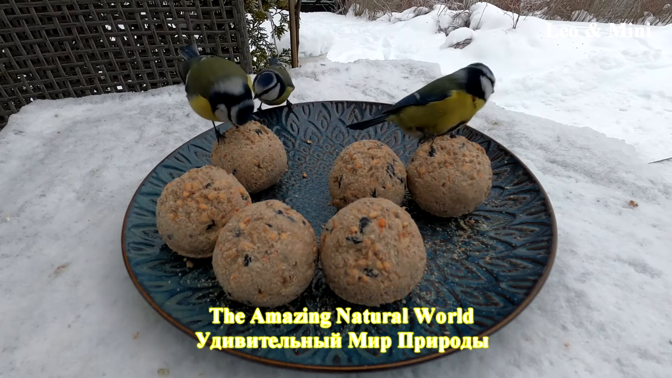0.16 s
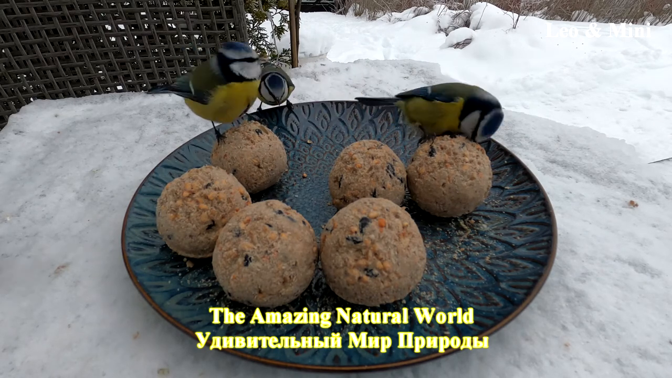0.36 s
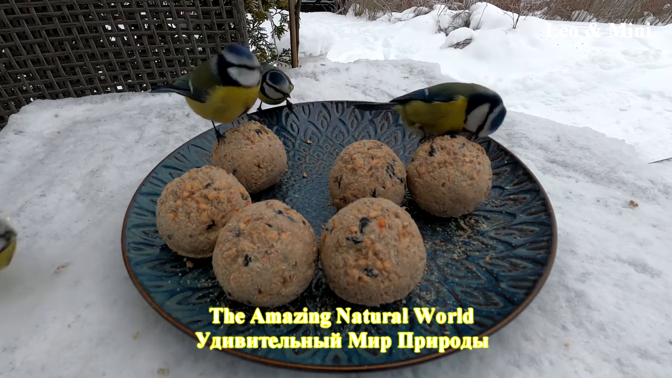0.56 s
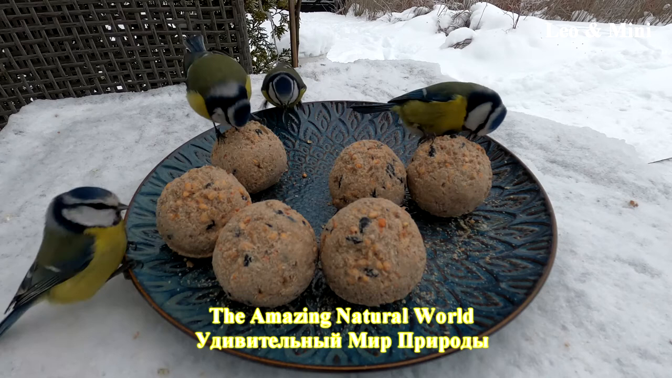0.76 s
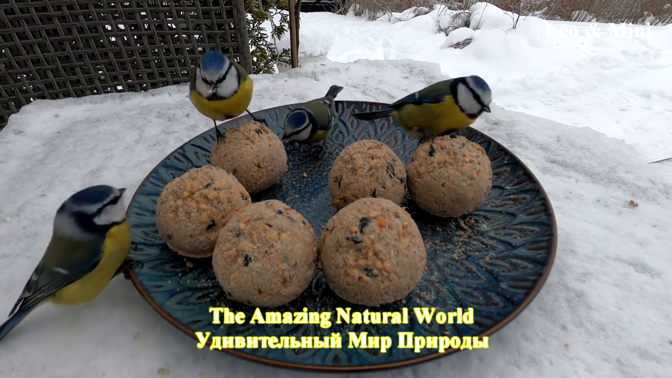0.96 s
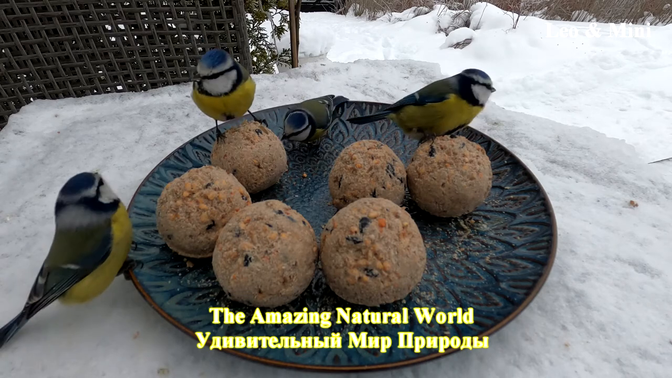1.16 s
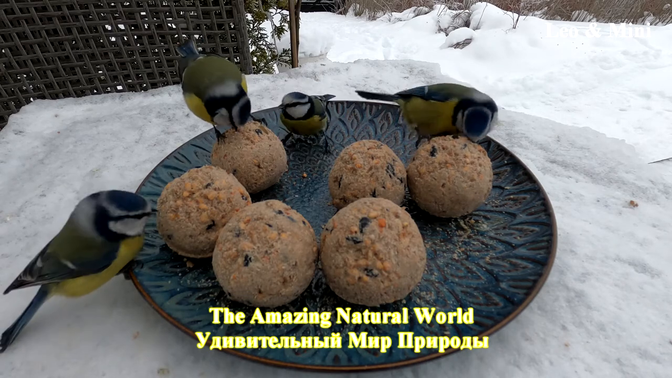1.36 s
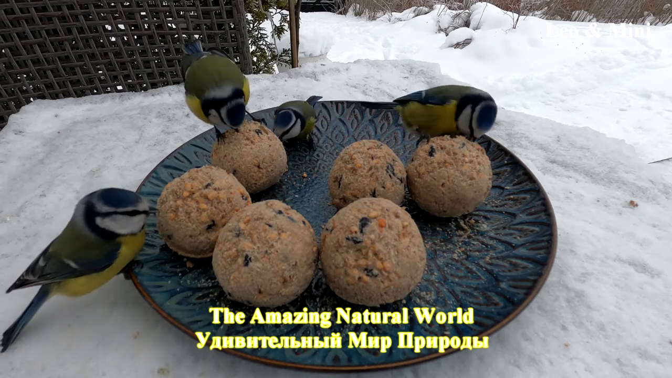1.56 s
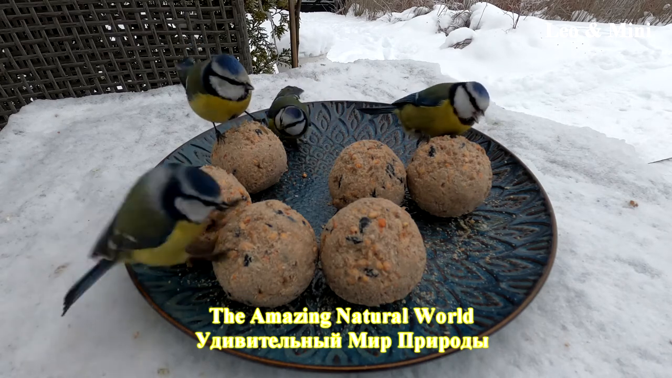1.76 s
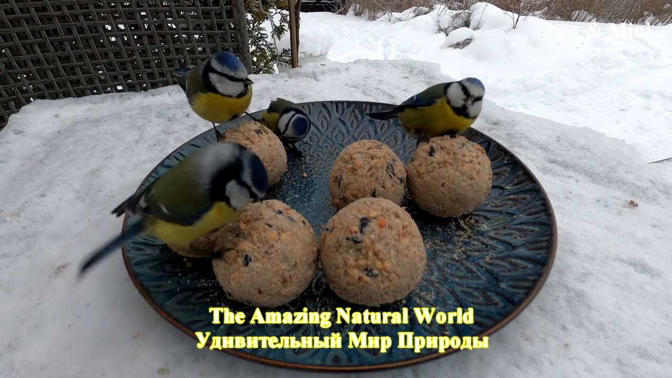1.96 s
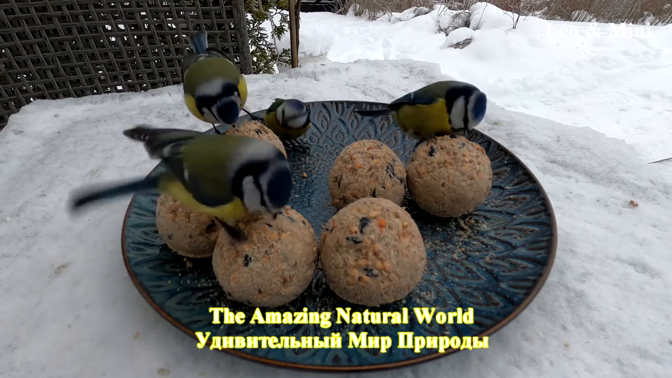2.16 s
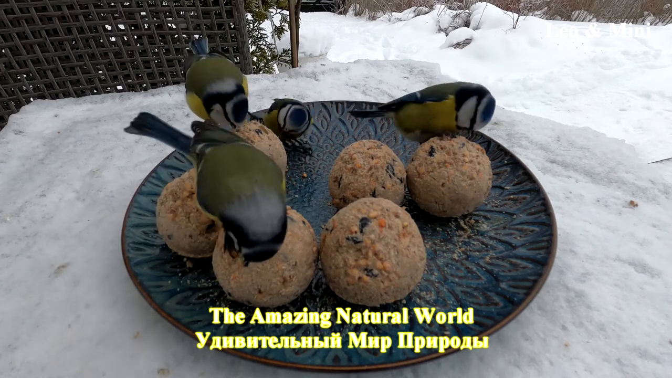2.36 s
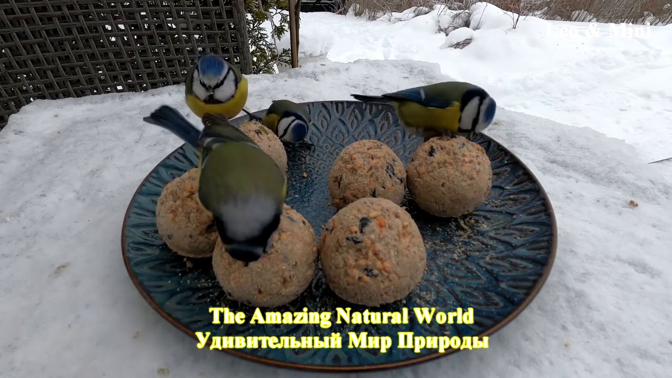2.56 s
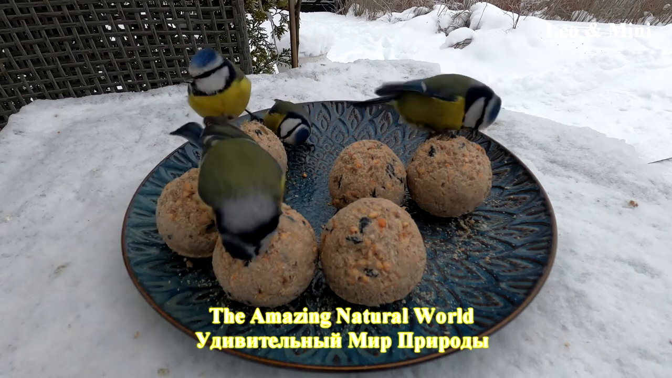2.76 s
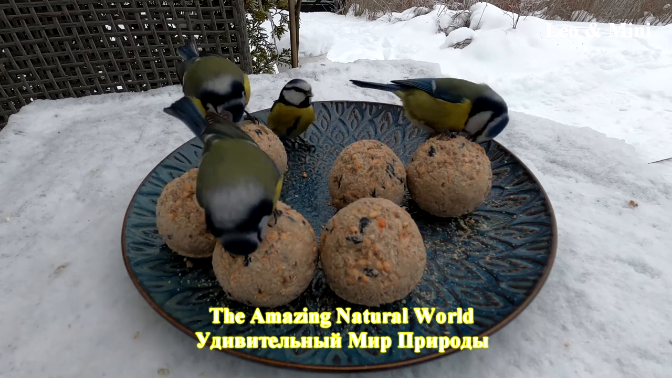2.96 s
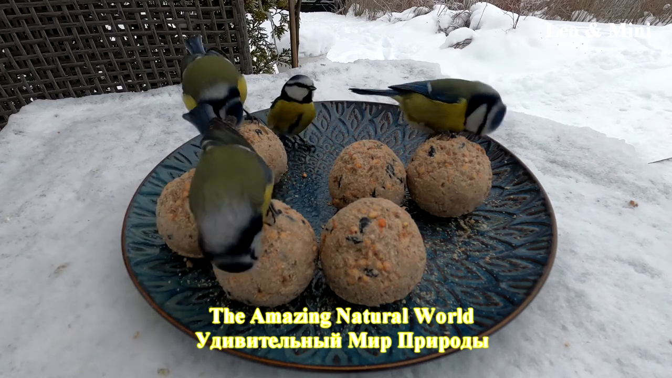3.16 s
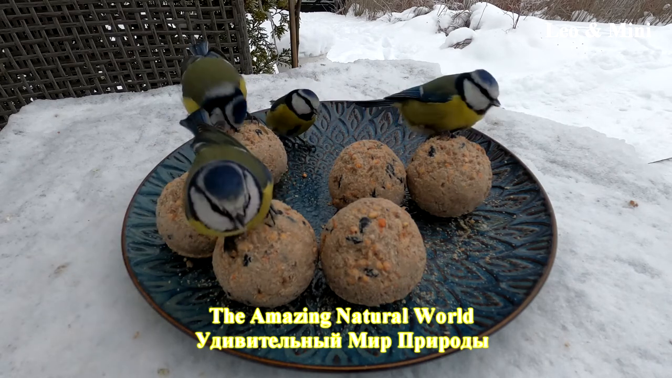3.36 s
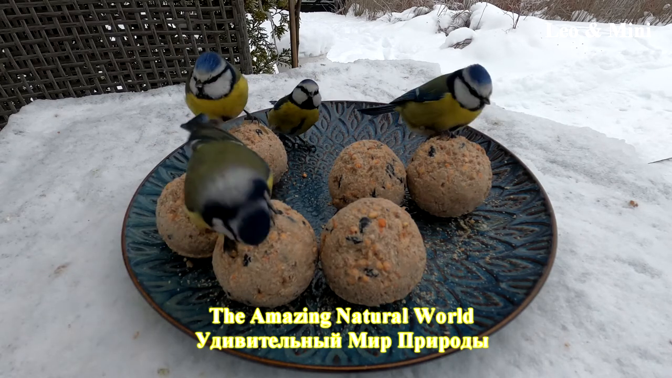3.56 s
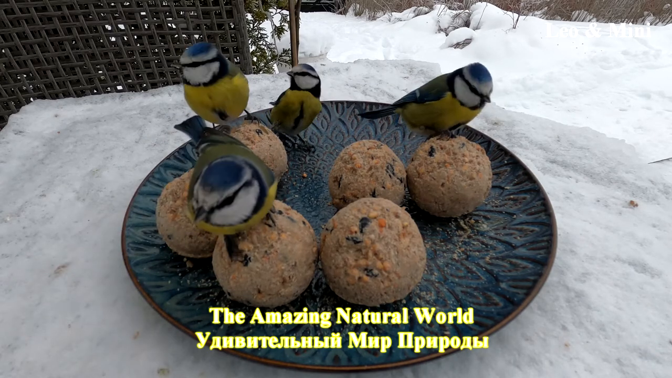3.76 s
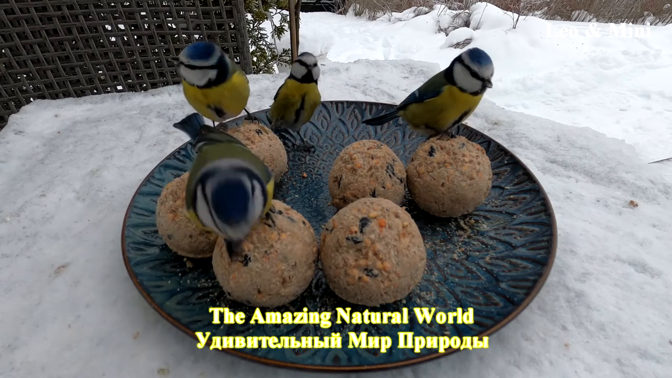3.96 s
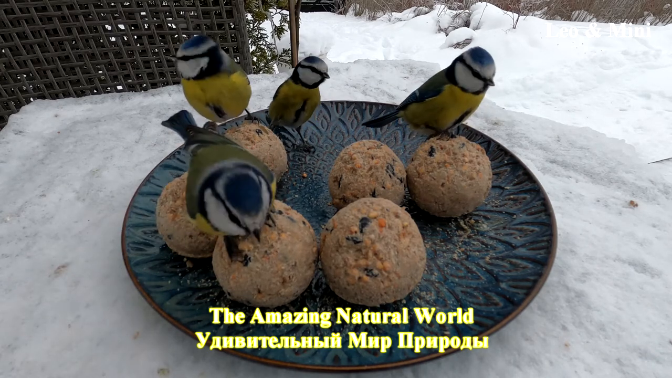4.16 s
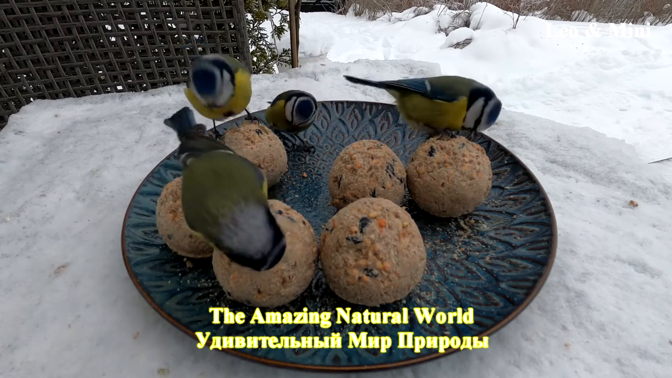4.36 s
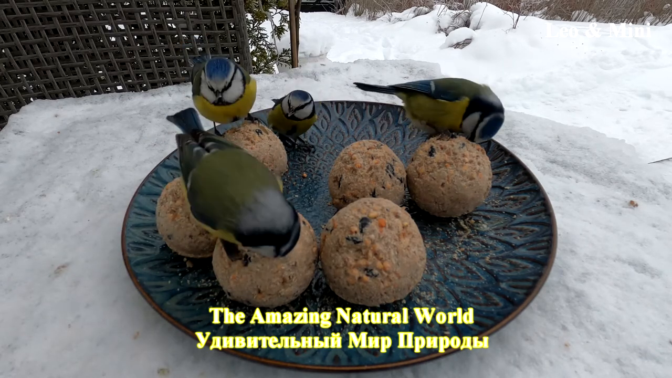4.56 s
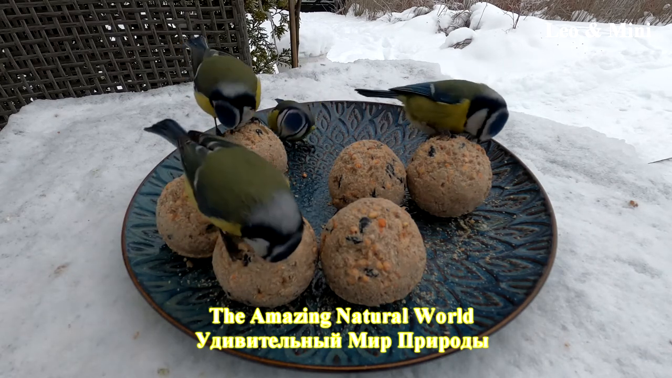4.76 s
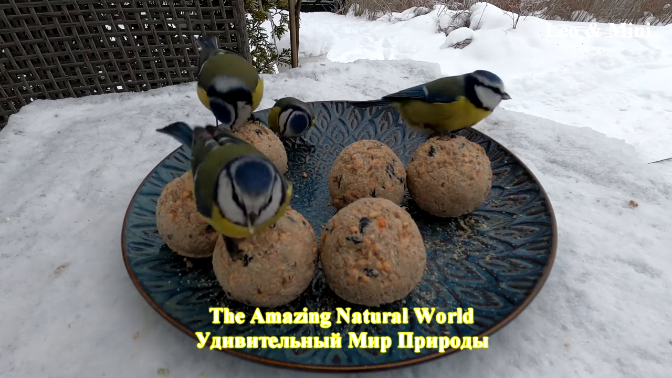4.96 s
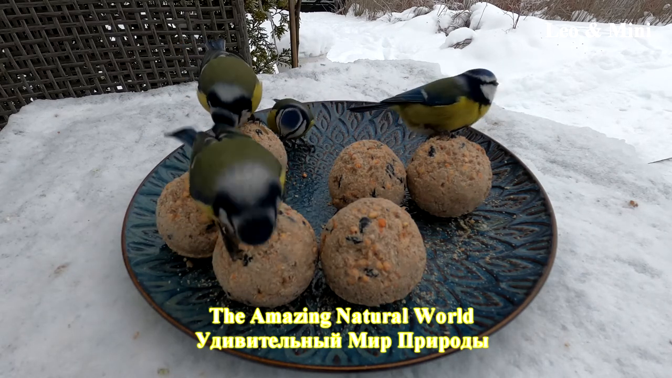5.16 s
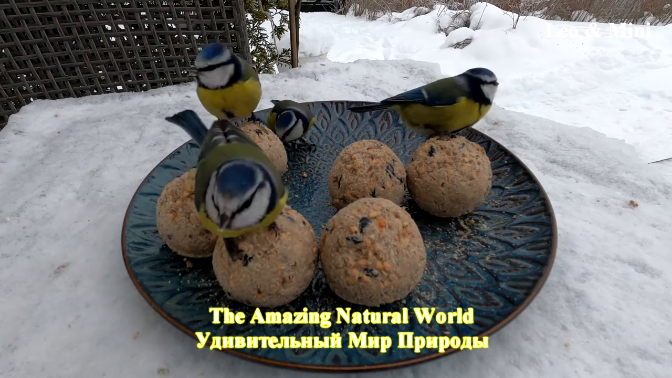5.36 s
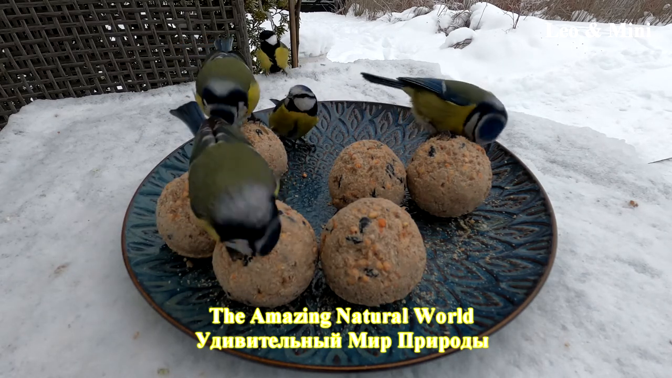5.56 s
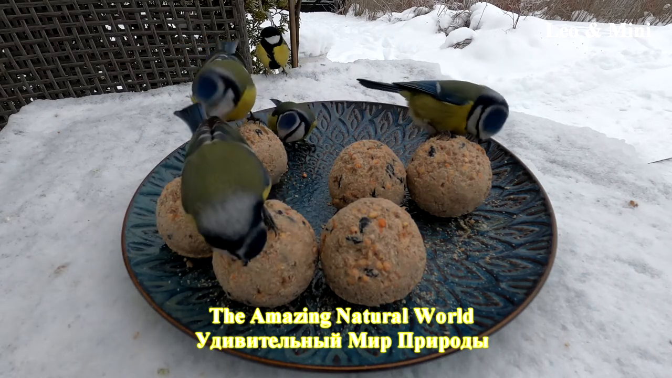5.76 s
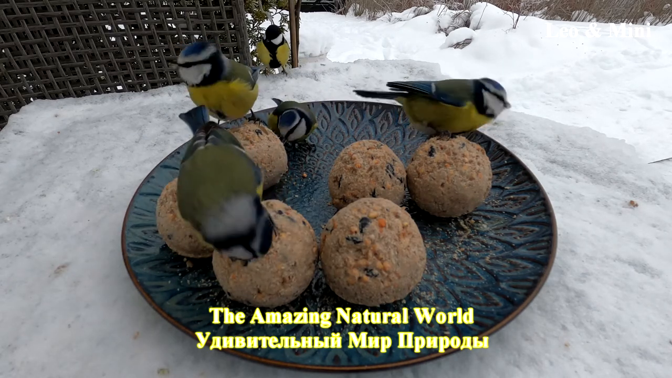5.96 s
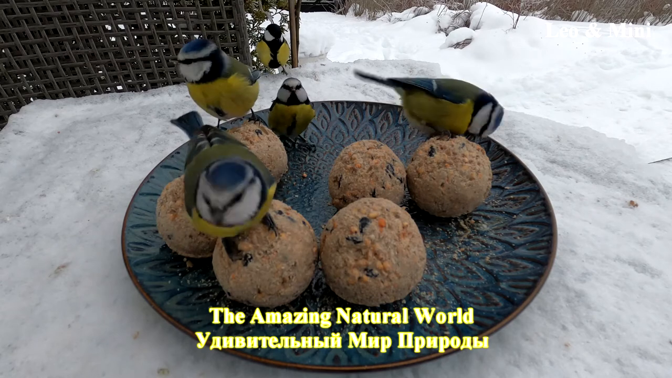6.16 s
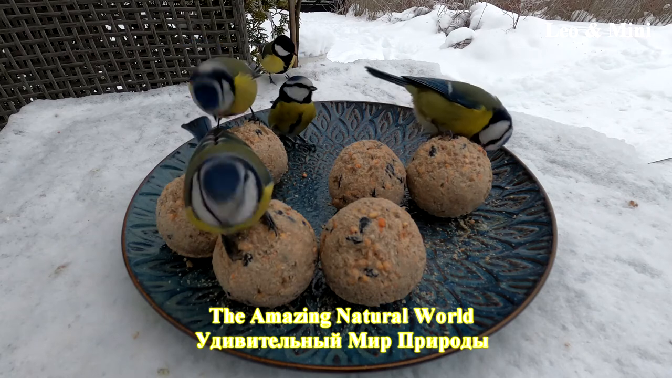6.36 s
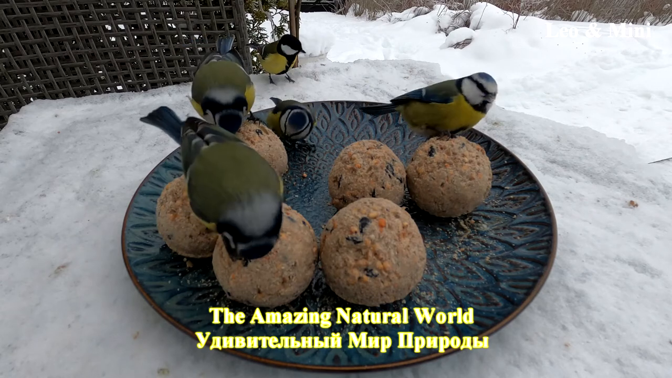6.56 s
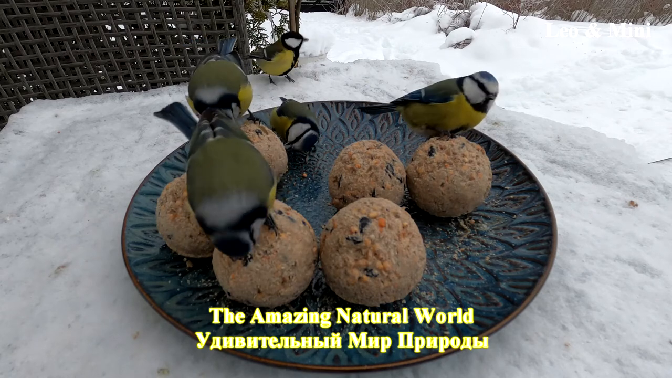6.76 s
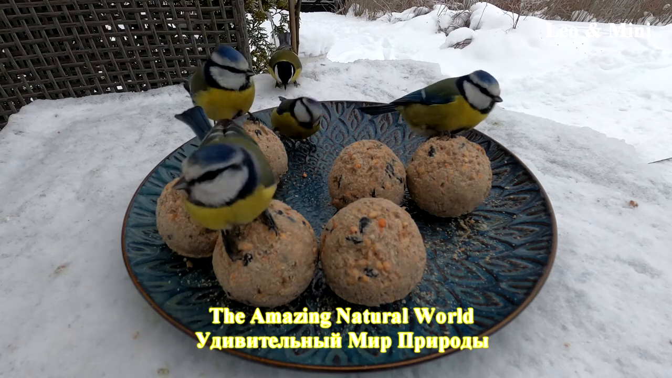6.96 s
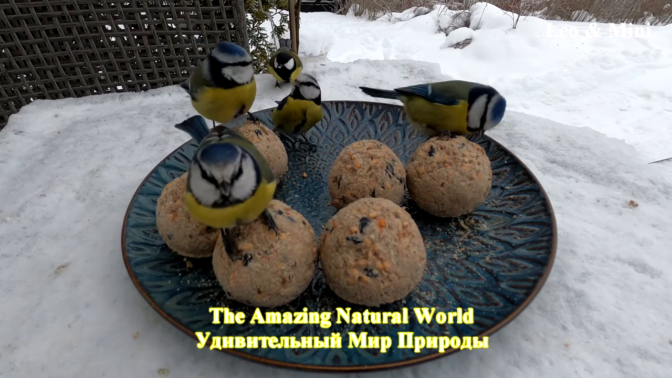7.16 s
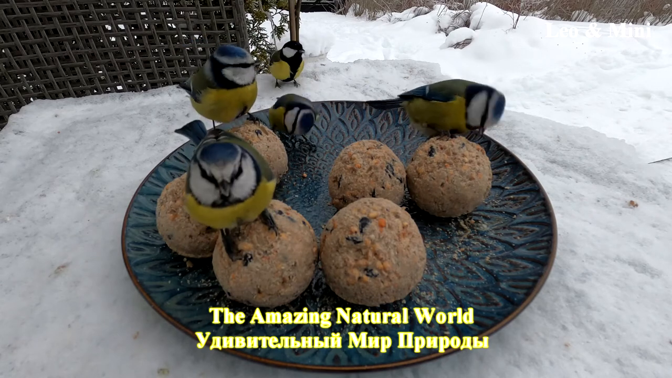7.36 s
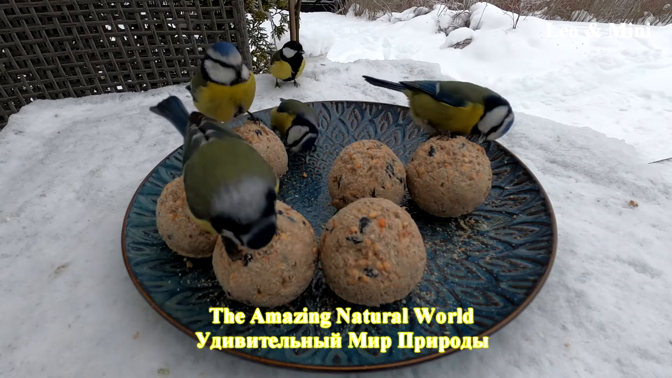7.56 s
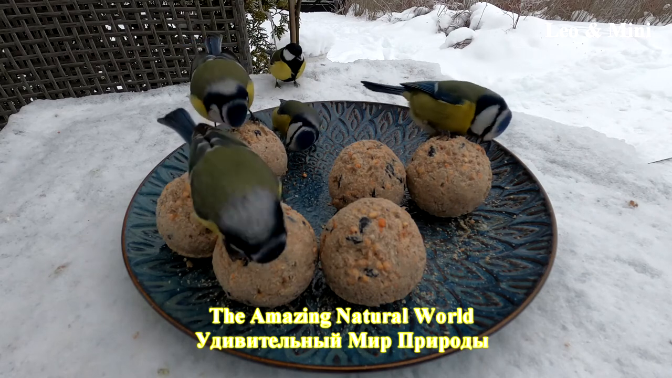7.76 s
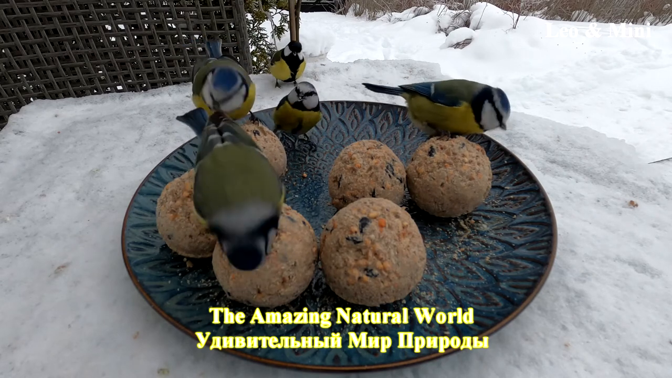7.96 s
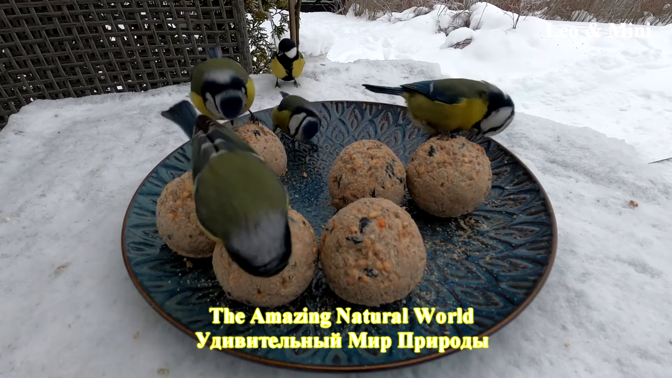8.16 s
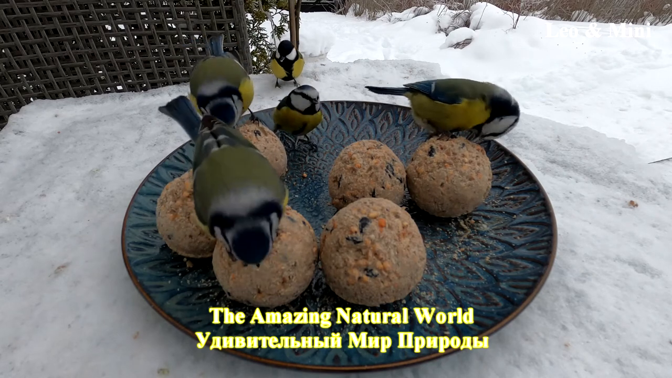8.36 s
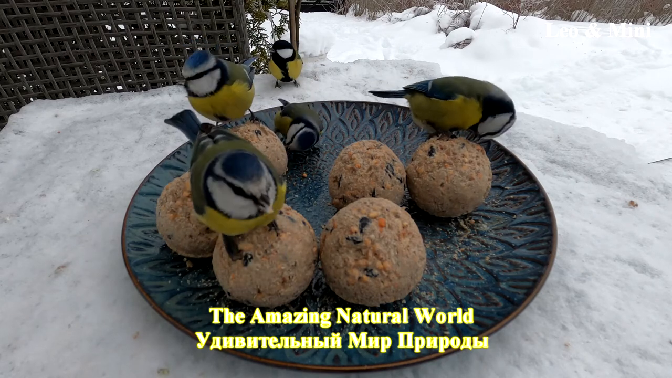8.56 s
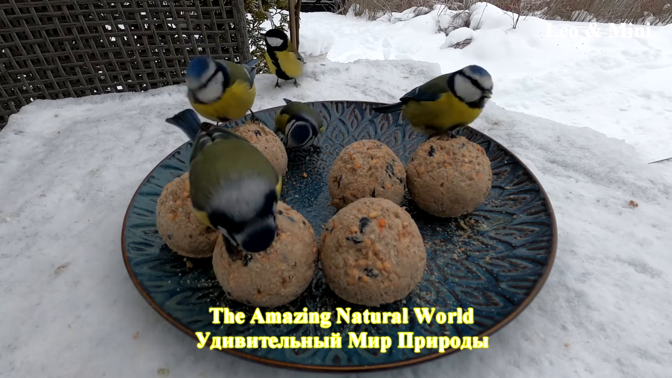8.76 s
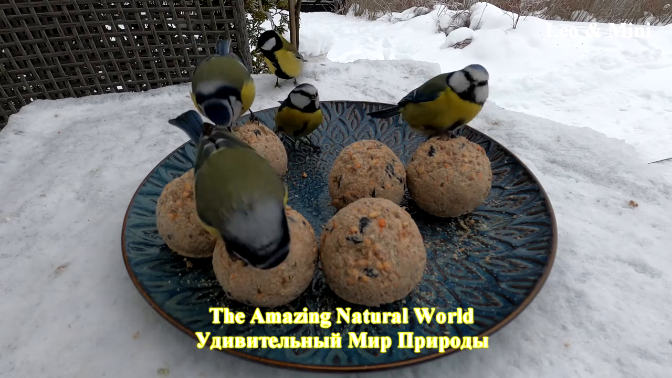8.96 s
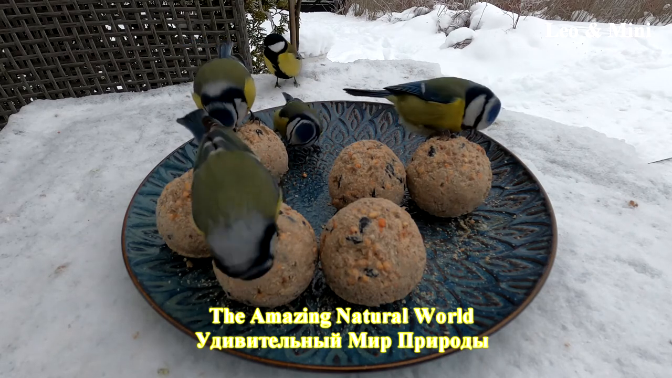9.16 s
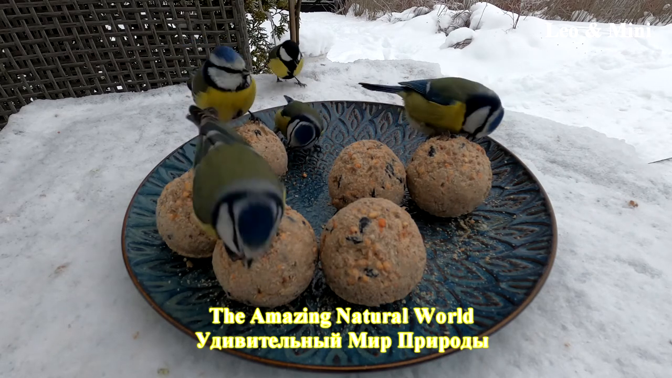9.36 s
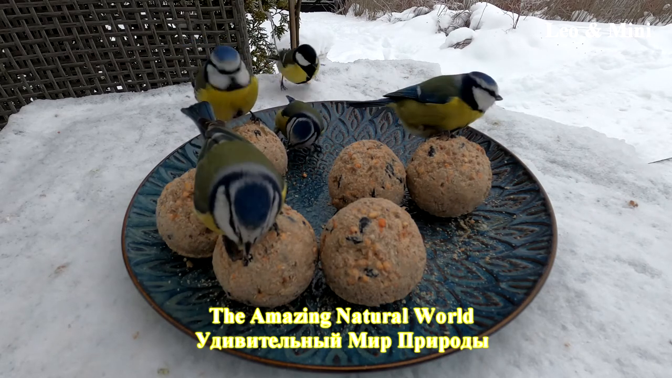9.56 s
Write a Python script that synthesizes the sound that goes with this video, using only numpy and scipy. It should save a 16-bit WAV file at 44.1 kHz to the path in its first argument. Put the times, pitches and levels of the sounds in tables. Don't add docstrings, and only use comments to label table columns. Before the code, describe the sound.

Small birds feed on a ceramic plate set on a hollow table in a quiet snowy garden, heard very close in stereo. A sharp ceramic ring opens, lighter clinks follow for two seconds, then irregular hollow thuds, crisp beak ticks, seed cracks and crumbling continue throughout. Wings whirr past around 3.4 and 7 seconds; thin high calls sound farther off, and wind puffs softly.

```python
import sys
import numpy as np
from scipy import signal
from scipy.fft import rfft, irfft, next_fast_len
from scipy.io import wavfile
from scipy.ndimage import uniform_filter1d

SR = 44100
rng = np.random.default_rng(int(sys.argv[2]) if len(sys.argv) > 2 else 0)


def field_ratio(decibels):
    return 10 ** (np.asarray(decibels, dtype=float) / 20)


def int16_out(signal):
    q = np.round(np.clip(np.atleast_2d(signal).T, -1, 1) * 32767)
    wavfile.write(sys.argv[1], SR, q.astype(np.int16))


N = 424683

# pitch_hz, density_db (per Hz)
GARDEN = [(60, -8), (339, -6), (727, -22), (1030, -14), (1180, -21), (5950, -31), (9450, -42), (15000, -37)]
GARDEN_DB = -43
# start_s, peak_db, rim_click_db
CLINKS = [(0.0164, -26, -46.5), (0.0597, -2, -34), (0.7123, -28.5, -36.5), (0.7214, -16, -54),
          (0.8091, -27.5, -55), (0.8814, -29.5, -37), (0.9991, -32, -38.5), (1.039, -28, -53),
          (1.1004, -24.5, -37), (1.2321, -24.5, -36.5), (1.3302, -24.5, -47.5), (1.501, -29, -32.5),
          (1.5394, -33, -47), (1.685, -36, -50), (1.8, -33, -48), (0.9, -31, -50), (1.275, -33, -50),
          (1.295, -33, -51), (1.7585, -39, -60.5), (1.8173, -23.5, -45), (1.9899, -33, -36.5)]
# pitch_hz, level_db, t60_s
PLATE = [(1523, 1, 0.089), (2266, 0, 0.077), (3095, -2, 0.11), (3989, -7, 0.093), (4958, -3, 0.1),
         (5992, -5, 0.12), (7101, -19, 0.14), (8285, -8, 0.067), (9561, -8, 0.084), (10890, -15, 0.074)]
# pitch_hz, level_db, t60_s
RIM = [(2313, 7.5, 0.038), (3585, 7.5, 0.036), (6400, -8, .03)]
# start_s, bright_peak_db, dull_part_db, left_right_db
TICKS = [(0.0629, -7.0, -12, 10), (1.0018, -11, -25.5, -2), (1.0718, -27.5, -17.5, 0),
         (1.098, -8, -21, -1.5), (1.502, -12.5, -30.0, -6.5), (1.9901, -12, -17.0, -1),
         (2.177, 13.5, -25.5, 8), (2.7196, -5.5, -20, -1), (2.82, -8.5, -20.5, -3),
         (3.0876, -1.5, -11.5, 0), (3.1948, -12.5, -23, 1), (3.3288, -8.5, -21.5, 0),
         (4.3708, -10.5, -26.5, -1), (4.5069, -4, -22, -3), (4.775, -9.5, -26, -2), (4.9645, -4, -9.5, 0),
         (5.1756, -12.5, -21.0, 0), (5.3457, 0.0, -16, -1), (5.6001, -7.5, -3.0, 2),
         (5.702, -14.5, -18.5, 0), (5.792, -11, -12, -0.5), (5.9271, -13.5, -20, -1),
         (6.557, -8, -30.0, -4), (6.8155, 2, -20.0, 0), (7.7192, -5, -22, -2.5), (8.0036, -4, -20.5, -10),
         (8.5292, -6, -22, 1), (9.063, -9, -21.5, -1), (9.1716, -8, -17.5, 0), (9.3835, -8, -18, -2)]
# start_s, bright_peak_db, left_right_db
NIBBLES = [(0.2139, -10.5, -1), (0.71, -19, 4), (1.039, -16, 7), (1.23, -18, -8), (1.26, -13, -3),
           (1.7587, -6.5, 0), (1.9135, -14, 4), (2.0708, -15.5, -4), (4.757, -15, -7), (5.2661, -12.5, -3),
           (5.897, -13, -4), (5.9483, -17, 6), (6.0087, -17, -8), (6.327, -19, 2), (6.6198, -16, -6),
           (6.725, -12.5, 1), (7.617, -18.5, 0), (7.7794, -10.5, -5), (7.8223, -10, -3), (9.273, -14, 4),
           (9.5245, -15, 2)]
# start_s, bright_peak_db
CRACKS = [(2.169, -19), (2.7432, -1.5), (3.2888, 1), (3.918, -10.5), (3.93, -11), (3.944, -11),
          (3.959, -16), (4.003, -10.5), (4.4195, -10.5), (4.514, -9.5), (4.527, -13), (4.556, -9),
          (4.58, -8.5), (4.781, -17), (4.787, -15), (4.984, -11), (4.975, -7), (5.024, -16), (5.3127, 3.5),
          (6.647, -7), (7.2433, -17), (7.2585, 6), (7.409, -19.5), (7.461, -16), (7.4882, -3),
          (7.5158, -6.5), (8.246, -7.5), (8.492, -13), (8.5105, -10.5)]
NIBBLE_DULL_DB, CRACK_DULL_DB = -18.5, -39
# pitch_hz, t60_s
KNOCK = [(1180, 0.028), (1525, 0.023)]
# start_s, peak_db
PECKS = [(0.063, -7), (0.782, -17.5), (1.278, -9.5), (1.399, -5.5), (2.248, -14.0), (2.292, -6.0),
         (2.377, -12.5), (2.44, -1.0), (2.517, -11), (2.633, -1), (2.726, 5.5), (2.821, 6), (3.09, 6),
         (3.195, 5), (4.316, -16.5), (4.373, -3.5), (4.505, 1.0), (5.349, 2.5), (5.427, -10), (5.704, 0.0),
         (5.794, -5.5), (5.898, -5.5), (6.011, -3.5), (6.196, -16.5), (6.649, -8), (6.724, -7.0),
         (6.761, -9.5), (6.82, -2.5), (7.722, -2), (7.892, -3.0)]
# start_s, peak_db
TUGS = [(0.44, -6.5), (1.037, -16.5), (1.074, -6.5), (2.557, -7), (3.233, -3), (3.409, -10.5), (4.668, -10),
        (4.741, -9), (4.853, 0.0), (4.965, 3), (5.823, -3.0), (6.104, -8.5), (6.325, -8.5), (6.559, -2.5),
        (7.939, -7.5), (8.004, -3.5), (8.426, -11.5), (8.955, -16.5), (9.066, -4.0), (9.174, -5.5),
        (9.2605, -9.5)]
# start_s, peak_db
HOPS = [(0.268, -20.0), (0.896, -11.5), (1.52, -15.5), (1.631, -11.0), (2.884, -9.0), (2.965, -14.5),
        (3.289, 0.5), (3.344, -4), (3.813, -20.0), (3.985, -22.5), (5.178, -5.5), (5.602, 0.5),
        (6.967, -19.5), (7.527, -16.5), (7.785, -7), (7.827, -6.5), (8.25, -11.0), (8.381, -16.5),
        (8.62, -13), (8.721, -16.0), (8.824, -15.5), (9.367, -6.5), (9.465, -12.0), (9.526, -11)]
PECK_DEEP_DB, TUG_DEEP_DB, HOP_DEEP_DB = -21.5, -8, -0.5
# start_s, peak_db, deep_modes_re_peak_db
BUMPS = [(0.529, -21.5, -5), (0.825, -16.5, -8.0), (1.469, -17.5, -7.5), (2.194, -13, -9.5),
         (2.4, -3.5, -11.0), (2.532, -4.5, -13), (3.645, -17.5, -11.0), (3.687, -11.5, -12),
         (4.759, -6, -15), (5.209, -22, -10.0), (5.286, -10.5, -8), (5.681, -7.5, -1), (5.931, -11.5, -4.0),
         (6.154, -17.0, -11.5), (6.239, -21.5, -8), (6.539, -13, -4.5), (7.214, -21, -9.5),
         (7.256, -19, -12), (7.298, -21.0, -10.0), (8.282, -18.5, -1), (8.309, -14.5, -3),
         (8.594, -19, -7.0), (8.847, -22, -4.0), (8.89, -17.5, -4), (8.977, -12.0, -13.5),
         (9.079, -5.5, -9.0), (9.22, -14.5, -6.0), (9.274, -5.5, -10), (9.336, -16, -7.0),
         (9.382, -4.5, -5.0)]
# pitch_hz, level_db, t60_s
TABLE = [(318, -5, .07), (358, -5, .07), (422, -4, .065), (470, -9, .05), (515, -3, .075), (590, -11, .045),
         (780, -19, .04), (1000, -17, .025)]
# pitch_hz, level_db, t60_s
TABLE_DEEP = [(162, -28, 0.066), (191.8, -0.5, 0.14), (236.3, -1.5, 0.07)]
SLAP_DB, SLAP_T60_S = -21, 0.025
# start_s, level_db
SHUFFLE = [
    (0.0, -34),
    (3.65, -24),
    (4.0, -30.5),
    (4.25, -43.5),
    (4.58, -26),
    (6.9, -26.5),
    (7.45, -33),
    (7.8, -28.5),
    (9.63, -30.5),
]
# start_s, peak_db, lose_20_db_s
BITES = [(0.076, -27.0, 0.06), (0.255, -33.0, 0.18), (0.327, -29.5, 0.1), (0.631, -32, 0.13),
         (0.726, -30.5, 0.04), (0.898, -30.5, 0.2), (0.918, -27.5, 0.11), (1.078, -28.5, 0.16),
         (1.289, -34, 0.46), (1.333, -31.5, 0.14), (1.513, -37.5, 0.13), (1.656, -37.5, 0.18),
         (1.788, -33.0, 0.09), (1.82, -33.5, 0.09), (1.952, -31, 0.13), (2.191, -24.5, 0.04),
         (2.239, -32.0, 0.18), (2.419, -30.5, 0.09), (2.562, -33.5, 0.35), (2.738, -26.5, 0.03),
         (2.834, -28.5, 0.02), (2.989, -26, 0.02), (3.093, -27.5, 0), (3.344, -34.5, 0.5),
         (3.608, -34.5, 0.5), (3.815, -33, 0.14), (3.947, -36.5, 0.25), (4.43, -38.5, 0.23),
         (4.522, -26.5, 0.07), (4.566, -28.5, 0.07), (4.773, -31, 0.04), (4.861, -31.0, 0.07),
         (4.973, -25, 0.05), (5.188, -36.5, 0.1), (5.324, -28, 0.12), (5.372, -36.0, 0.25),
         (5.627, -29.0, 0.23), (5.819, -27.0, 0.15), (6.038, -31, 0.5), (6.254, -30.0, 0.13),
         (6.389, -29.0, 0.2), (6.621, -28.5, 0.22), (6.848, -28.5, 0.13), (6.948, -32, 0.5),
         (7.275, -31, 0.08), (7.307, -33.5, 0.2), (7.503, -29, 0.07), (7.786, -35.5, 0.25),
         (7.922, -36, 0.5), (8.002, -30, 0.12), (8.269, -32, 0.15), (8.565, -33, 0.5), (8.716, -34, 0.2),
         (8.756, -34.5, 0.27), (8.844, -36.5, 0.55), (9.083, -30, 0.1), (9.187, -34, 0.1),
         (9.323, -31.0, 0.16), (9.423, -34, 0.5), (9.615, -26, 0.04)]
# pitch_hz, density_db (per Hz)
CRUMB = [(700, -34), (1200, -2.5), (2300, -7.5), (4000, -6.5), (6000, 2.5), (8000, -16.5), (10000, -11.5),
         (15000, -26)]
RUSTLE_DB = -18
# start_s, level_db, bright_part_re_level_db, left_right_db
SNAPS = [(0.2687, -22.0, -26.0, 3), (0.3114, -20, -15.5, 7), (0.4407, -23, -24.5, -2),
         (0.8102, -23.0, -14, -2), (1.0722, -15, -18, 1), (1.3312, -20, -27.5, 2), (1.4, -23, -19, -1),
         (1.9321, -19.0, -8.5, 3.5), (2.199, -17.5, -9.5, 0), (2.5329, -17, -8.0, 0),
         (2.6439, -18.5, -8.5, 2), (2.7282, -13, -25.5, -4), (3.0784, -14, -23.5, -1),
         (3.0993, -17.5, -19.5, -3), (3.2897, -13.5, -1.5, 0), (3.3118, -20, -5.0, 1),
         (3.4333, -17.5, -14.5, 0), (4.3719, -23, 0, 0), (4.4221, -21.5, -9.5, 0), (4.5263, -16, -14.5, 0),
         (4.7581, -23.0, -9.0, -1), (5.1779, -20, -11.0, -1), (5.8041, -13.5, -14.0, 0),
         (5.9289, -15, -13, 1), (6.22, -25.5, -5.5, 5), (6.2637, -22.5, -17.5, 9),
         (6.3593, -20.0, -14.5, 1), (6.3775, -16.5, -16.0, 3), (6.4928, -24.5, -7.5, 1),
         (6.6489, -15.5, -6, 0), (6.7247, -18, -20, 0), (7.721, -20, -9, 2), (7.8917, -19.5, -11.0, 1),
         (8.3036, -22.5, -4, 3), (8.5436, -18, -18.5, 2), (8.6322, -18.5, -17, 9), (9.081, -14.0, -7, 1),
         (9.1724, -17.5, -10.0, 0), (9.2744, -23.0, -6.0, 2), (9.3846, -13.5, -13, 0),
         (9.397, -17.5, -9.5, 0), (9.431, -27.0, -11.0, 2), (9.4583, -23.0, -16.0, 1),
         (9.5989, -17.5, -19, 2), (9.6222, -14.5, -18, 6)]
# start_s, peak_db
FLICKS = [(0.379, -29), (0.5791, -33), (0.61, -31), (0.6754, -24.5), (1.1667, -20), (1.2935, -25.5),
          (2.543, -13), (2.633, -14), (4.9544, -9), (5.2764, -19), (6.0277, -21), (6.3974, -26),
          (6.408, -23), (8.3529, -23), (8.3719, -17), (8.4178, -27), (8.4442, -29), (8.5849, -15.5),
          (8.6842, -27), (8.7525, -26.5), (8.852, -21), (8.9545, -23), (8.9744, -29)]
# start_s, peak_db, lose_20_db_s
GUST = [(0.28, -23.5, 0.3), (0.85, -29, 0.25), (1.08, -9.0, 0.13), (1.6, -26.5, 0.5), (1.77, -4, 0.03),
        (1.97, -26.0, 0.1), (2.23, -30.0, 0.1), (2.8, -20.0, 0.36), (3.5, -23.5, 0.7), (3.86, -16.5, 0.13),
        (4.56, -4, 0.1), (4.95, -25.5, 0.6), (5.67, -14.5, 0.24), (6.0, -24, 0.5), (6.62, -25.5, 0.5),
        (7.2, -24.5, 0.5), (7.75, -18.5, 0.24), (8.29, -26.0, 0.8), (8.85, -17.0, 0.5), (9.35, -27.5, 0.2)]
CALM_DB = -53
# start_s, length_s, first_pitch_hz, last_pitch_hz, level_db
CHIRPS = [(1.645, .045, 8200, 8100, -50), (1.872, 0.043, 7600, 7500, -46), (2.57, .045, 8000, 8050, -51),
          (2.86, 0.065, 8400, 7300, -47.5), (3.022, 0.07, 7700, 8050, -48), (4.01, 0.064, 7900, 7400, -36),
          (4.102, 0.046, 6300, 5600, -46.5), (4.277, 0.068, 7650, 7540, -48.5),
          (4.425, 0.032, 8100, 7000, -40), (4.45, 0.03, 8200, 7100, -40), (4.817, 0.077, 8500, 7640, -39.5),
          (5.374, 0.04, 7900, 7000, -40), (5.631, 0.041, 8300, 7400, -27),
          (5.652, 0.035, 8200, 7900, -31.5), (6.13, 0.076, 6900, 6400, -45),
          (7.058, 0.051, 7600, 7100, -49), (8.125, 0.045, 8600, 8100, -43)]
ARCH_HZ_PER_S = 3500
# first_s, last_s, beat_s
FLIGHTS = [
    (3.407, 3.46, .049),
    (3.507, 4.07, .043),
    (7.045, 7.47, .0417),
    (7.527, 7.66, .043),
]
# start_s, push_db, feather_snap_db, low_throb_db
PASSES = [
    (3.43, -19.5, -22, -10.5),
    (3.55, -9, -38, -12.5),
    (3.8, -17, -17, -23),
    (4.07, -19.5, -30, -48),
    (7.07, -15.5, -31, -25),
    (7.15, -8.5, -25, -29),
    (7.4, -17, -45, -26),
    (7.56, -20, -24, -44),
    (7.66, -31, -40, -47.5),
]
BEAT_SPREAD_DB = 2
# pitch_hz, lead_rad
LEFT_LEAD = [(60, 0), (260, -0.54), (520, -0.24), (2070, -0.55), (7500, -1.1), (12400, -1.16)]
LEFT_DULL_HZ = 10300


def ring(clicks, hz, t60):
    radius, turn = field_ratio(-60 / (t60 * SR)), 2 * np.pi * hz / SR
    return signal.lfilter([0, np.sin(turn)], [1, -2 * radius * np.cos(turn), radius * radius], clicks + 1e-18)


def band(x, low_hz, high_hz):
    return signal.sosfilt(signal.butter(2, [low_hz, high_hz], "band", fs=SR, output="sos"), x + 1e-18)


def soften(x, cut_hz):
    return signal.sosfilt(signal.butter(2, cut_hz, fs=SR, output="sos"), x + 1e-18)


def fade(x, t60):
    return signal.lfilter([1], [1, -field_ratio(-60 / (t60 * SR))], x + 1e-18)


def rms_one(x):
    return x / np.sqrt(np.mean(x ** 2) + 1e-20)


def drift(rate, depth_db):
    knots = field_ratio(depth_db * rng.standard_normal(int(N / SR * 60) + 2))
    return np.interp(np.arange(N) / SR * min(rate, 59), np.arange(len(knots)), knots)


def train(times, level_db, pan_db=0):
    out = np.zeros((2, N))
    at = np.minimum((np.asarray(times) * SR).astype(int), N - 1)
    side_db = np.array([[.5], [-.5]]) * pan_db * np.ones(len(at))
    np.add.at(out, (slice(None), at), field_ratio(level_db + side_db))
    return out


def grains(per_s, spread_db):
    out, born = np.zeros(N), rng.random(N) < per_s / SR
    count = born.sum()
    size_db = spread_db * np.minimum(rng.exponential(1, count), 5)
    out[born] = field_ratio(size_db) * rng.choice([-1, 1], count)
    return out


def white():
    return rng.standard_normal(N)


def pair(draw, alike):
    alike = np.clip(alike, 0, 1)
    return np.sqrt(1 + alike) * draw() + np.sqrt(1 - alike) * draw() * [[1], [-1]]


def coloured(x, spectrum, patchy_db):
    hz, level_db = np.transpose(spectrum)
    edges = 15360 / 2 ** np.arange(0, np.log2(15360 / max(hz[0], 60)), .5)[::-1]
    gains_db = np.interp(np.log(edges[:-1] * 1.19), np.log(hz), level_db)
    out = 0
    for k, (gain_db, low_hz, high_hz) in enumerate(zip(gains_db, edges, edges[1:])):
        out = out + (-1) ** k * field_ratio(gain_db) * drift(45, patchy_db) * band(x, low_hz, high_hz)
    return rms_one(out)


def curve(rows):
    s, level_db = np.transpose(rows)
    return np.interp(np.arange(N) / SR, s, level_db)


def swells(rows, rest_db):
    s, peak_db, width = np.transpose(rows)[:, :, None]
    t = np.arange(0, N + 64, 64)
    highest_db = np.max(peak_db - 20 * abs(t / SR - s) / width, axis=0)
    return np.maximum(np.interp(np.arange(N), t, highest_db), rest_db)


def garden():
    return field_ratio(GARDEN_DB) * coloured(pair(white, alike=0.41), GARDEN, patchy_db=-5.0)


def plate():
    s, peak_db, rim_db = np.transpose(CLINKS)
    luck = rng.normal(0, 1, (len(s), len(PLATE), 2))
    out = 0
    for k, (hz, mode_db, t60) in enumerate(PLATE):
        strike_db = peak_db * (1 + 0.083 * np.log2(hz / 2000))
        strike_db = strike_db + mode_db - 3.5 + 1.5 * luck[:, k, 0]
        out = out + ring(train(s, strike_db, 3.3 * luck[:, k, 1]), hz, t60)
    for hz, mode_db, t60 in RIM:
        out = out + ring(train(s, rim_db + mode_db + 9.5), hz, t60)
    return out


def ticks():
    nibbles = [(s, db, db + NIBBLE_DULL_DB, pan) for s, db, pan in NIBBLES]
    cracks = [(s, db, db + CRACK_DULL_DB, 1.5) for s, db in CRACKS]
    s, bright_db, dull_db, pan_db = np.transpose(TICKS + nibbles + cracks)
    noise = pair(white, alike=1.0)
    out = 0
    for level_db, low_hz, high_hz, t60 in ((bright_db - 5.5, 4800, 8300, .014), (dull_db + 9.5, 900, 2500, .022)):
        hit = train(s, level_db, pan_db)
        swell = soften(fade(hit, t60) + field_ratio(-21) * fade(hit, 0.13), cut_hz=990)
        out = out + band(swell * noise + field_ratio(10.0) * hit, low_hz, high_hz)
    hiss = soften(fade(train(s, bright_db - 22.0, pan_db), 0.026), cut_hz=580)
    air = band(hiss * noise, 7850, 13400)
    knock = sum(ring(train(s, dull_db - 4.0, pan_db / 2), hz, t60) for hz, t60 in KNOCK)
    return out + air + knock


def table():
    kinds = ((PECKS, PECK_DEEP_DB), (TUGS, TUG_DEEP_DB), (HOPS, HOP_DEEP_DB))
    hits = [(*row, deep_db) for rows, deep_db in kinds for row in rows]
    s, peak_db, deep_db = np.transpose(hits + BUMPS)
    luck = rng.normal(0, 1, (len(s), len(TABLE + TABLE_DEEP), 3))
    scratches = pair(lambda: grains(140 * drift(12, depth_db=3.5), spread_db=4.5), alike=0.25)
    claws = field_ratio(curve(SHUFFLE) - 35.0) * rms_one(scratches)
    rattle = pair(lambda: grains(250, spread_db=3.0), alike=.85)
    levels = peak_db - 9, peak_db + deep_db - 11.0
    murmurs = [field_ratio(-19.5) * fade(train(s, level_db, -5.0), 0.16) * rattle + claws for level_db in levels]
    out = 0
    for k, (hz, mode_db, t60) in enumerate(TABLE + TABLE_DEEP):
        deep = int(k >= len(TABLE))
        late_s = 0.00181 * abs(luck[:, k, 1])
        blows = train(s + late_s, levels[deep] + 1.5 * luck[:, k, 0], -4 + 3.6 * luck[:, k, 2])
        under = signal.butter(2, hz * 0.31, "high", fs=SR, output="sos")
        out = out + field_ratio(mode_db + 6.5) * signal.sosfilt(under, ring(blows + murmurs[deep], hz, t60))
    slap = fade(train(s, peak_db + SLAP_DB, -2.5), SLAP_T60_S) * white()
    return soften(out, cut_hz=500) + band(slap, 600, 1500)


def crumbs():
    noise = pair(white, alike=0.64)
    dull = soften(noise, cut_hz=3000)
    cracks = [fade(abs(grains(130 * drift(30, 3), spread_db=2.8)), .011) for _ in range(2)]
    grit = rms_one((.9 + cracks[0]) * dull) + rms_one((.9 + cracks[1]) * (noise - dull))
    even = grit / np.sqrt(uniform_filter1d(grit ** 2, size=3000).mean(axis=0))
    level_db = swells(BITES, curve(SHUFFLE) + RUSTLE_DB) + 0.5
    return field_ratio(level_db) * coloured(even, CRUMB, patchy_db=3.5)


def snaps():
    s, level_db, bright_db, pan_db = np.transpose(SNAPS)
    flick_s, flick_db = np.transpose(FLICKS)
    noise = pair(white, alike=0.92)
    dull = train(s, level_db + 3.5, pan_db)
    bright = train(s, level_db + bright_db + 1.0, pan_db) + train(flick_s, flick_db - 3.5)
    out = 0
    for hit, low_hz, high_hz in ((dull, 1100, 4600), (bright, 4600, 8300)):
        grit = (fade(hit, .012) + field_ratio(-21) * fade(hit, .07)) * noise
        out = out + band(field_ratio(10) * hit + grit, low_hz, high_hz)
    return out


def gusts():
    air = soften(band(pair(white, alike=0.69), 18.5, 47.0), cut_hz=124)
    evened = air / np.sqrt(uniform_filter1d(air ** 2, size=4000).mean(axis=0) + 1e-12)
    return field_ratio(swells(GUST, CALM_DB)) * evened


def chirps():
    out = np.zeros(N)
    for s, length, first_hz, last_hz, level_db in CHIRPS:
        u = np.linspace(0, 1, int(length * SR))
        hz = first_hz * (1 - u) + last_hz * u + ARCH_HZ_PER_S * length * 4 * u * (1 - u)
        call = signal.windows.tukey(len(u), .4) * np.sin(2 * np.pi * np.cumsum(hz) / SR)
        at = int(s * SR)
        out[at:at + len(u)] += field_ratio(level_db + 0.5) * call
    return out * field_ratio(np.array([[-1.5], [1.5]])) * drift(55, depth_db=4.0)


def beats():
    s = np.concatenate([np.arange(first, last, beat) for first, last, beat in FLIGHTS])
    at, *levels = np.transpose(PASSES)
    luck = rng.normal(0, BEAT_SPREAD_DB, (len(s), 3))
    return s, *[np.interp(s, at, level_db) + luck[:, k] for k, level_db in enumerate(levels)]


def wings():
    s, push_db, snap_db, throb_db = beats()
    push = ring(train(s, push_db, 0.97), 232, 0.058)
    push = push + ring(train(s + 0.002, push_db - 0.5, 2.1), 161.6, 0.072)
    throb = ring(train(s, throb_db + 1), 69.5, 0.21)
    snap = fade(train(s, snap_db + 4.0), 0.049) * pair(white, alike=0.8)
    return band(push, 115, 278) + soften(throb, cut_hz=300) + band(snap, 230, 1010)


def scene():
    feeding = plate() + ticks() + table() + crumbs() + snaps()
    return garden() + feeding + gusts() + chirps() + wings()


def band_limit(x):
    return signal.sosfilt(signal.butter(12, 15810, fs=SR, output="sos"), x)


def record(dry):
    heard, size = soften(dry, cut_hz=12200), next_fast_len(N)
    bins_hz = np.arange(size // 2 + 1) * SR / size + 1
    hz, lead = np.transpose(LEFT_LEAD)
    phase = np.interp(np.log(bins_hz), np.log(hz), lead)
    port = np.exp(1j * phase) / np.hypot(1, bins_hz / LEFT_DULL_HZ)
    left = irfft(rfft(heard[0], size) * port, size)[:N]
    mix = np.clip(np.array([left, heard[1]]), -1, 1)
    return band_limit(mix)


dry = scene()
out = record(dry)
int16_out(out)
```